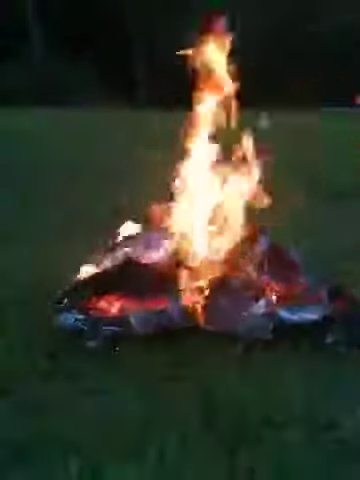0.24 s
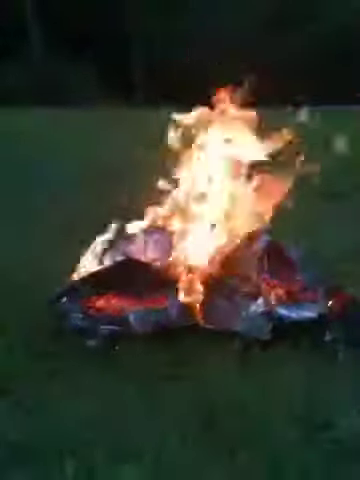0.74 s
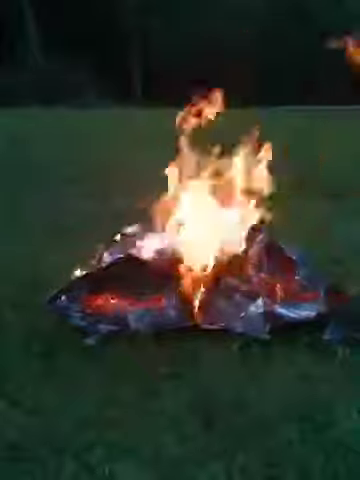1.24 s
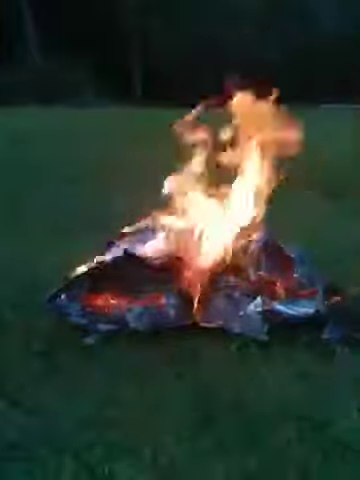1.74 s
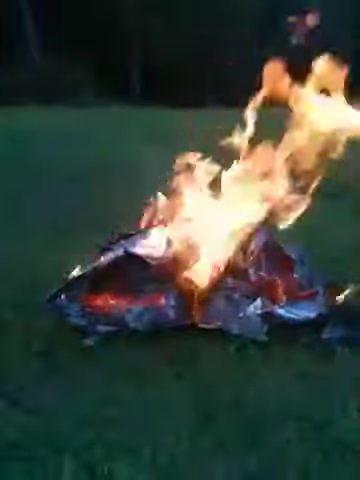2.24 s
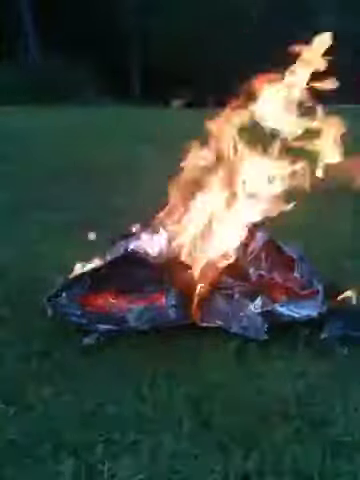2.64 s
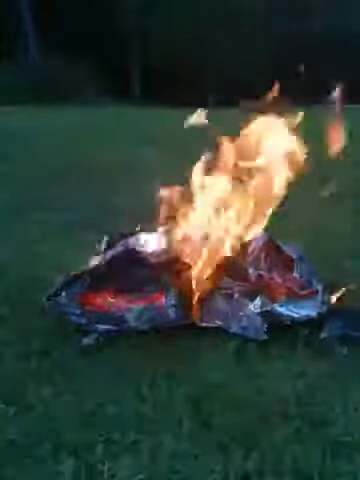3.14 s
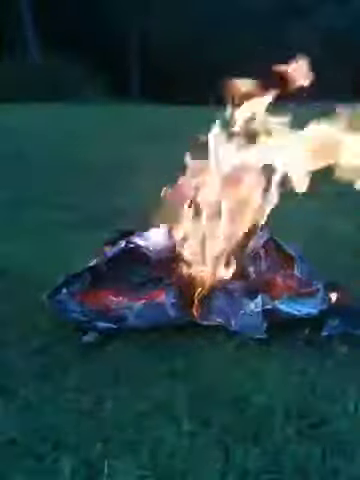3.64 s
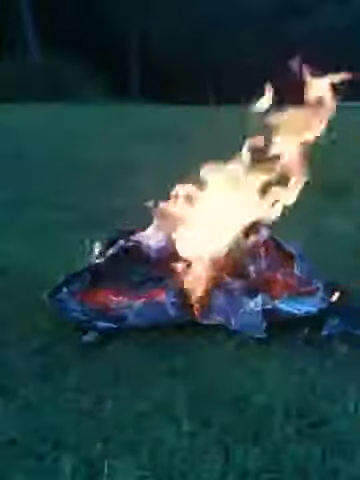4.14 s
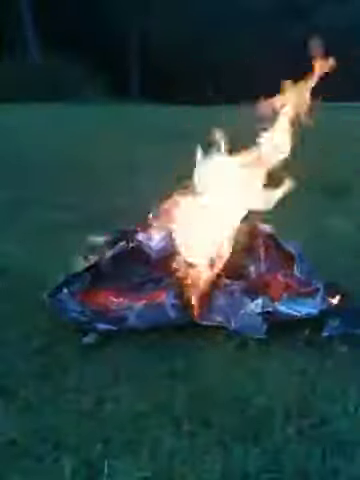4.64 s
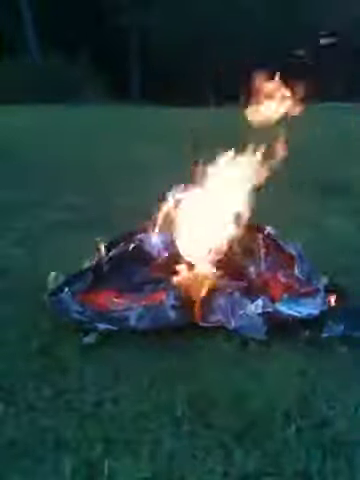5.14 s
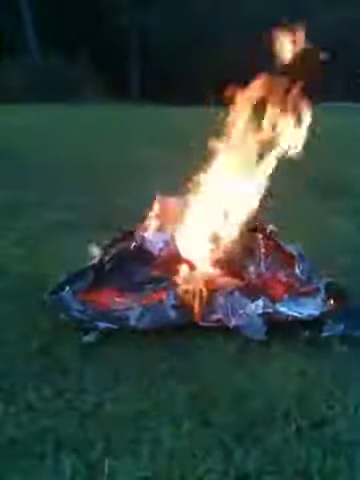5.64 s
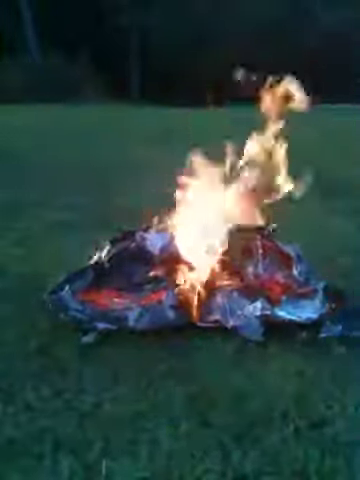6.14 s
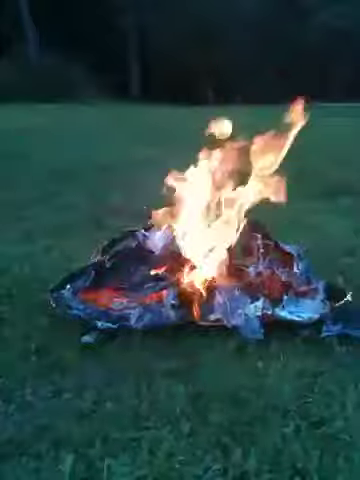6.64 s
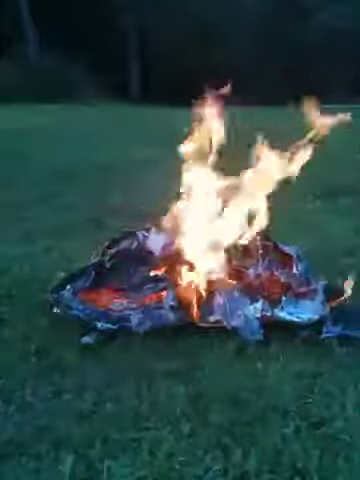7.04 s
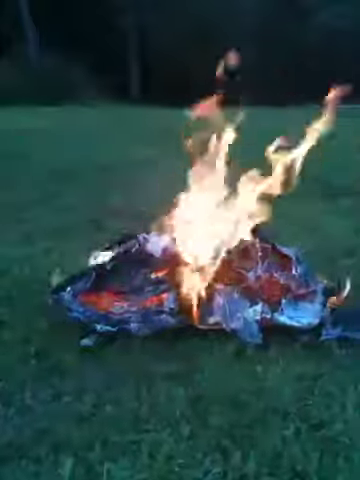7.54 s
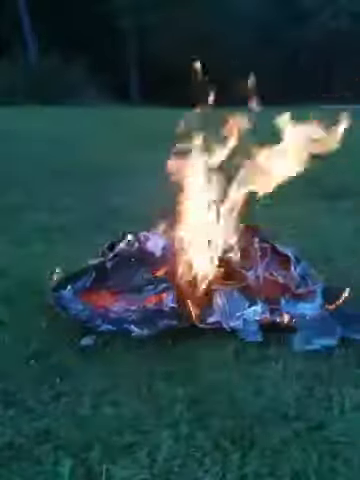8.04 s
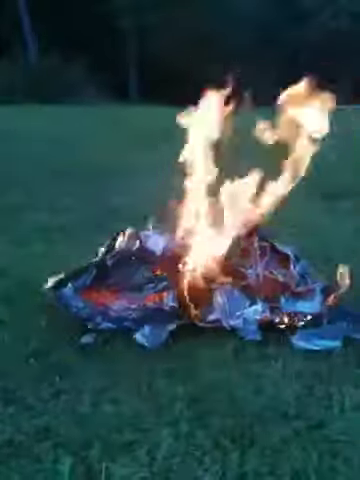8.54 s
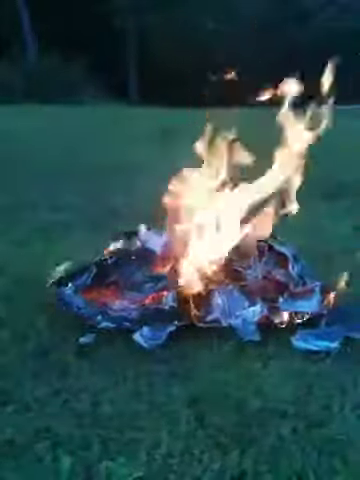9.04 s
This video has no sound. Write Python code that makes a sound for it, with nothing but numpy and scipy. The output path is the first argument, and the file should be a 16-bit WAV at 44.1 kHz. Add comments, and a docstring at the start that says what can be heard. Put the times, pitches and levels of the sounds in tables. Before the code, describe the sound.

A burning cardboard box on grass at dusk, heard from a few steps away, in mono. Low flames rumble and flutter softly under a steady airy hiss. Fine dry crackle never stops, and short ragged pops come in uneven clusters, some sharper and louder. Occasional low puffs and tiny treble spits appear. Behind lie a faint shrill insect-like band, a weak far hum and a very thin high whine. Dry open air, no echo.

```python
"""Flames rumble softly and hiss as a cardboard box burns on a lawn at dusk, a few steps away.
Shaped noise makes both; noise bursts ringing the board's resonances make a fine crackle and short ragged pops.
Behind lie a steady shrill noise band like evening insects, a faint far hum of sines and a thin electric whine.
Now and then a tongue of gas catches with a soft low puff, and tiny blisters spit pure treble."""
import sys
import numpy as np
from scipy import signal
from scipy.fft import rfft, irfft, next_fast_len
from scipy.io import wavfile

SR = 44100
rng = np.random.default_rng(int(sys.argv[2]) if len(sys.argv) > 2 else 0)


def to_wav(sig):
    """Store sig (one row per channel, or 1-D mono) as 16-bit WAV at the path in sys.argv[1].

    Samples outside -1..1 are clipped; the rate is SR.
    """
    pcm = np.clip(np.atleast_2d(sig), -1, 1) * 32767
    pcm = np.round(pcm).astype(np.int16)
    wavfile.write(sys.argv[1], SR, pcm.T)  # frames by channels


N = 409233  # length of the scene in samples


def from_db(db):
    """Logarithmic level: decibels become an amplitude gain."""
    return 10 ** (np.asarray(db) / 20)


def rms_one(x):
    """Normalisation: scale to a root-mean-square of 1."""
    return x / np.sqrt(np.mean(x ** 2) + 1e-20)


def curve_at(rows, s):
    """Linear interpolation: a curve's value at the given times."""
    return np.interp(s, *np.transpose(rows))


def anywhen(count):
    """Independent random events: moments spread evenly by chance over the scene."""
    return rng.uniform(0, N / SR, count)


def drift(rate):
    """Low-passed noise: a smooth random curve of spread 1 that changes about rate times a second."""
    step, settle = 40, 2000  # samples between points; points dropped while the filter settles
    pole = np.exp(-2 * step * np.pi * rate / SR)
    white = rng.standard_normal(N // step + settle + 2)
    slow = signal.lfilter([1], [1, -2 * pole, pole * pole], white)[settle:]
    return np.interp(np.arange(N) / step, np.arange(len(slow)), rms_one(slow))


def band(x, low_hz, high_hz, order=2):
    """Band limiting: a causal Butterworth band-pass."""
    edges_hz = [low_hz, min(high_hz, SR / 2 - 1)]
    return signal.sosfilt(signal.butter(order, edges_hz, "band", fs=SR, output="sos"), x)


def noise(spectrum):
    """Spectral shaping: white noise weighted by a spectrum, with an rms of 1."""
    hz, db = np.transpose(spectrum)
    size = next_fast_len(N)
    white = rfft(rng.standard_normal(size))
    bins_hz = np.maximum(np.arange(len(white)) * SR / size, 1)
    weights_db = np.interp(np.log(bins_hz), np.log(hz), db)
    return rms_one(irfft(white * from_db(weights_db), size)[:N])


def flutter(x, split_hz, low_db, high_db, per_s):
    """Amplitude modulation: the parts below and above a split pitch waver independently."""
    low = signal.sosfiltfilt(signal.butter(3, split_hz, fs=SR, output="sos"), x)
    high = x - low
    return low * from_db(low_db * drift(per_s)) + high * from_db(high_db * drift(per_s))


# size of the flames, before the rumble's trim. Columns: time_s, level_db
FLAME_SIZE = [(0, -58), (0.6, -59), (1.05, -57), (1.45, -58.8), (1.6, -57), (2.08, -59), (2.25, -58.5),
              (2.5, -59), (2.65, -55), (2.8, -59), (2.97, -56), (3.4, -58), (3.68, -57), (3.9, -59),
              (4.65, -60), (4.9, -59.5), (5.05, -57.5), (5.17, -61), (5.4, -58.5), (5.7, -61), (6.0, -59),
              (6.6, -60.5), (7.0, -58.5), (7.55, -59.5), (7.73, -61), (7.95, -57.5), (8.12, -60),
              (8.45, -57.5), (8.7, -59), (9.28, -59)]
# relative spectrum of the turbulent burning. Columns: frequency_hz, density_db (per Hz)
RUMBLE_SPECTRUM = [(20, -57), (50, -27), (80, -15), (120, -5), (165, 1.5), (250, -0.5), (350, -2.5),
                   (480, -8), (570, -17.5), (850, -16), (1200, -40), (2000, -46)]


def rumble():
    """Combustion turbulence: low noise swells with the flames and flutters as they lick."""
    trim_db, lick_db, licks_per_s = -0.5, 1.3, 16.6
    sound = flutter(noise(RUMBLE_SPECTRUM), split_hz=200, low_db=lick_db, high_db=lick_db, per_s=licks_per_s)
    # the deepest part also heaves slowly
    sound = flutter(sound, split_hz=42, low_db=4.5, high_db=0.0, per_s=3.4)
    level_db = curve_at(FLAME_SIZE, np.arange(N) / SR) + trim_db
    return from_db(level_db) * sound


# how hard the board gives off gas, before the hiss's trim; it also drives the ticks.
# Columns: time_s, level_db
GAS_RELEASE = [(0.0, -51), (0.54, -53), (1.29, -51.5), (2.4, -52.5), (3.98, -51.5), (4.94, -53),
               (5.22, -52), (5.63, -54.5), (6.18, -52.5), (9.28, -53)]
# relative spectrum of the escaping gas. Columns: frequency_hz, density_db (per Hz)
HISS_SPECTRUM = [(500, -15.5), (800, -11.5), (1180, -5), (1600, 3), (2400, 1), (2750, -6.5), (3550, 0),
                 (3770, -1.5), (4100, 1), (4500, -1), (5600, -10), (7800, -7.5), (9000, -12.5),
                 (10300, -8.5), (13000, -18.5), (16000, -28)]


def hiss():
    """Jet noise: hot gas escaping from the board hisses and flutters."""
    trim_db = -4  # level against the gas release
    sound = flutter(noise(HISS_SPECTRUM), split_hz=3050, low_db=1.4, high_db=2, per_s=35)
    level_db = curve_at(GAS_RELEASE, np.arange(N) / SR) + trim_db
    return from_db(level_db) * sound


def insects():
    """Narrow-band noise: a shrill far band, like a chorus of insects, wavers in level."""
    centre_hz, width_hz, level_db, waver_db = 7020, 600, -62.5, 1
    chorus = band(rng.standard_normal(N), centre_hz - width_hz / 2, centre_hz + width_hz / 2, order=1)
    chorus = rms_one(band(chorus, 5870, 7380))
    return from_db(level_db + waver_db * drift(8.0)) * chorus


# the partials of the far hum. Columns: frequency_hz, level_db (rms)
HUM_PARTIALS = [(86, -101), (173, -74), (255, -70.5), (506, -83)]


def hum():
    """Phase modulation: each far partial is a sine whose phase wanders slowly."""
    t, out = np.arange(N) / SR, 0
    for hz, db in HUM_PARTIALS:
        phase = 2 * np.pi * hz * t + 1.52 * drift(0.89)  # wander in radians
        out = out + from_db(db) * np.sqrt(2) * np.sin(phase)
    return out


def whine():
    """Polarity reversal: a thin high sine that keeps flipping its sign splits into close sidebands."""
    pitch_hz, flip_hz, level_db = 15000, 29.97, -73
    t = np.arange(N) / SR
    polarity = np.tanh(10 * np.sin(2 * np.pi * flip_hz * t))
    tone = np.sin(2 * np.pi * pitch_hz * t) * polarity
    return from_db(level_db) * rms_one(band(tone, pitch_hz - 190, pitch_hz + 190))


def peak(hz, width_hz, db):
    """Second-order resonance: one filter section, a hollow if db is negative."""
    gain, damping = from_db(db / 2), np.pi * width_hz / SR
    turn = -2 * np.cos(2 * np.pi * hz / SR)
    zeros = [1 + damping * gain, turn, 1 - damping * gain]
    poles = [1 + damping / gain, turn, 1 - damping / gain]
    return np.array(zeros + poles) / poles[0]


# peaks and hollows in the board's response. Columns: frequency_hz, width_hz, height_db
BOARD_MODES = [(1130, 66, -13), (1612, 32, 6), (2580, 110, 1.5), (2720, 89, -20.5), (3577, 146, 8),
               (3750, 115, -6.5), (4093, 340, 7.5), (5636, 390, -9.5), (7400, 420, 1), (8480, 1700, -7),
               (12570, 3200, -9.5)]


def board(x):
    """Modal filtering: a chain of peaks and hollows; the narrow ones ring for a few milliseconds."""
    return signal.sosfilt([peak(*row) for row in BOARD_MODES], x)


# ranges in which the board sounds, in the order thud, knock, crack, snap; base levels of a small tick.
# Columns: low_hz, high_hz, tick_level_db
BOARD_RANGES = [(665, 1090, -76.5), (1452, 2430, -65), (2630, 5310, -60.5), (5390, 12300, -66)]


def bursts(times, decays, rings_hz, rings_db, levels_db, grain_db, rise_s):
    """Impulsive excitation: a sharp break and a run of tearing fibres ring the pocket and the board."""
    length, head = 1600, 353  # samples: whole burst, and its first 8 ms, which set its level
    ring_share = .12  # width of a pocket's resonance as a share of its pitch
    break_db, break_s = 5.5, .0008  # first break against the tearing: strength, decay time
    slow_tear_s = .005  # bursts that last longer than this open with hardly any break
    scatter_db, scatter_s = -20, .011  # weak tail thrown back by the heap and the ground
    t = np.arange(length) / SR
    chance = rng.standard_normal((len(times), 2, length), dtype=np.float32)
    fibres = chance[:, 0] * from_db(grain_db * np.minimum(chance[:, 1], 1))
    decays = np.abs(decays)[:, None]
    first_break = from_db(break_db) * np.exp(-t / break_s) * np.exp(-(decays / slow_tear_s) ** 2)
    scatter = from_db(scatter_db) * np.exp(-t / scatter_s)
    shape = (1 - np.exp(-t / rise_s)) * (first_break + np.exp(-t / decays) + scatter)
    rung = []
    for hz, db, tear in zip(rings_hz, rings_db, fibres * shape):
        b, a = np.split(peak(hz, hz * ring_share, db), 2)
        rung.append(signal.lfilter(b, a, tear))
    tears = board(rung)
    # the size and place of a tear decide how strongly it drives each range of the board
    sounds = 0
    for (low_hz, high_hz, _), db in zip(BOARD_RANGES, levels_db):
        part = band(tears, low_hz, high_hz, order=3)
        gains = from_db(db) / part[:, :head].std(axis=1)
        sounds = sounds + part * gains[:, None]
    out = np.zeros(N + length)
    for at, sound in zip(np.clip(times * SR, 0, N).astype(int), sounds):
        out[at:at + length] += sound
    return out[:N]


def ticks(times, level_db, bright_db, size_spread_db, tilt_spread_db, range_spread_db, decay_s):
    """Random excitation: small bursts, dull or bright by chance, stronger while more gas escapes."""
    count = len(times)
    rings_hz = np.exp(rng.uniform(np.log(1400), np.log(9000), count))
    size, tilt, length, *own = np.clip(rng.standard_normal((count, 3 + len(BOARD_RANGES))), -2, 2).T
    vigour_db = curve_at(GAS_RELEASE, times) - np.mean(np.array(GAS_RELEASE)[:, 1])
    sizes_db = level_db + vigour_db + size_spread_db * size
    tilts_db = bright_db + tilt_spread_db * tilt
    slopes = np.linspace(-1, 1, len(BOARD_RANGES))  # brightness lifts the high ranges, lowers the low
    levels_db = [tick_db + sizes_db + tilts_db * slope + range_spread_db * luck
                 for (_, _, tick_db), slope, luck in zip(BOARD_RANGES, slopes, own)]
    decays = decay_s * from_db(4 * length)
    rings_db = np.full(count, 9)
    return bursts(times, decays, rings_hz, rings_db, levels_db, grain_db=6.0, rise_s=0.00048)


def pips(times, level_db, spread_db, low_hz, high_hz, decay_s, rise_s):
    """Damped oscillation: small pockets that open cleanly ring on one pitch, coloured by the board."""
    length = 700  # samples
    t, out = np.arange(length) / SR, np.zeros(N + length)
    shape = (1 - np.exp(-t / rise_s)) * np.exp(-t / decay_s)
    for at, (size, pitch) in zip((times * SR).astype(int), rng.random((len(times), 2))):
        hz = low_hz * (high_hz / low_hz) ** pitch
        gain = from_db(level_db - spread_db * size)
        out[at:at + length] += gain * shape * np.sin(2 * np.pi * hz * t)
    return board(out[:N] + 1e-18)


# the clearest spits of tiny blisters, levels before the trim. Columns: start_s, level_db
CLEAR_SPITS = [(1.3133, -38.5), (1.4082, -40), (2.048, -37), (2.7736, -42), (3.62, -43), (3.9644, -43),
               (4.2497, -40), (4.4448, -42), (5.5504, -41), (5.6017, -36), (5.7452, -36), (5.892, -42),
               (6.2697, -40), (6.78, -42), (7.0579, -39), (8.227, -35.5), (9.2209, -38.5)]


def spits(level_db, faint_count, faint_db, spread_db, low_hz, high_hz, decay_s):
    """Exponential decay: blisters spit treble noise alone, a few clearly, more faintly at random."""
    times, clear_db = np.transpose(CLEAR_SPITS)
    starts = np.zeros(N)
    faint_at = (anywhen(count=faint_count) * SR).astype(int)
    starts[faint_at] = from_db(faint_db + spread_db * rng.uniform(-1, 1, faint_count))
    starts[(times * SR).astype(int)] = from_db(clear_db + level_db)
    envelope = signal.lfilter([1], [1, -np.exp(-1 / (decay_s * SR))], starts + 1e-18)
    return envelope * rms_one(band(rng.standard_normal(N), low_hz, high_hz))


def crackle():
    """Superposition of small events: fine ticks, dry clicks of embers, thin spits and pitched pips."""
    fine = ticks(anywhen(count=520), level_db=-1.5, bright_db=-0.1, size_spread_db=1.0,
                 tilt_spread_db=3.5, range_spread_db=3.5, decay_s=0.0026)
    embers = ticks(anywhen(count=260), level_db=0.4, bright_db=-1.5, size_spread_db=1.5,
                   tilt_spread_db=4.5, range_spread_db=3.0, decay_s=0.001)
    thin = spits(level_db=-7, faint_count=45, faint_db=-52.5, spread_db=-3.0,
                 low_hz=7650, high_hz=12600, decay_s=0.0025)
    pitched = pips(anywhen(count=90), level_db=-43, spread_db=6, low_hz=1400, high_hz=4890,
                   decay_s=0.0017, rise_s=0.0005)
    return fine + embers + thin + pitched


# bursting pockets; the last four levels are rms over the first 8 ms of each range, before the trim.
# Columns: start_s, decay_s, ring_hz, ring_height_db, thud_db, knock_db, crack_db, snap_db
POCKET_POPS = [(0.0832, 0.003, 3800, 14, -70, -52, -44, -52), (0.0973, 0.0045, 1680, 6, -76, -52, -52, -55),
               (0.108, 0.003, 2100, 6, -65.0, -49, -52, -54),
               (0.1117, 0.0016, 7300, 11, -70, -53, -51, -51),
               (0.1224, 0.0042, 7300, 12, -73.0, -51, -49, -51.0),
               (0.145, 0.003, 2940, 10, -71, -54, -49.5, -54), (0.155, 0.002, 4600, 8, -74, -59, -55, -54),
               (0.16, 0.0051, 3900, 4, -76, -59, -53, -60), (0.2174, 0.0018, 4090, 9, -80, -54, -51, -54.5),
               (0.3158, 0.011, 5700, 12, -78.5, -56, -52, -60), (0.369, 0.002, 4390, 9, -78, -56, -54, -70),
               (0.3992, 0.01, 3800, 9, -78.5, -59, -53, -61), (0.471, 0.002, 1750, 8, -76, -52, -55, -62),
               (0.4815, 0.002, 6600, 8, -78, -64, -53, -54),
               (0.5558, 0.0072, 7300, 6, -68.0, -64, -44.5, -57),
               (0.579, 0.002, 3530, 10, -75, -59, -50, -56), (0.588, 0.005, 4010, 14, -76, -49.5, -45, -54),
               (0.6144, 0.011, 6200, 16, -78.5, -65, -50, -58),
               (0.843, 0.0043, 3940, 4, -71, -61, -44, -44.5),
               (0.9136, 0.0099, 6160, 6, -63.0, -51, -46, -58),
               (1.023, 0.001, 2000, 10, -78, -50.5, -56, -70), (1.0853, 0.002, 4130, 9, -77, -56, -56, -70),
               (1.0903, 0.003, 3400, 14, -78.0, -53.5, -47, -60),
               (1.1403, 0.0043, 1440, 9, -69, -52, -46, -56.5),
               (1.1692, 0.001, 6090, 12, -71, -67, -49, -53),
               (1.24, 0.0054, 4900, 6, -78.0, -54, -49.5, -52),
               (1.3216, 0.0076, 5770, 4, -78.5, -53, -50, -55.0),
               (1.346, 0.002, 3570, 9, -78, -67, -53.5, -62),
               (1.3564, 0.0082, 2500, 12, -68.5, -56, -51, -55),
               (1.38, 0.003, 3110, 12, -67.0, -65.0, -52.5, -65.5),
               (1.409, 0.0021, 2940, 9, -74, -63, -52, -56),
               (1.4326, 0.0054, 7100, 1, -66, -57, -39.5, -39.5),
               (1.4588, 0.002, 3530, 10, -74, -67, -53, -64), (1.49, 0.002, 2200, 19, -68, -52, -64, -70),
               (1.5755, 0.0059, 3840, 17, -68.5, -51.5, -44.5, -49.5),
               (1.5978, 0.0053, 2690, 9, -68.5, -58.0, -49, -50.5),
               (1.8173, 0.0045, 4400, 5, -63, -51.5, -45, -50),
               (1.8788, 0.0058, 5660, 4, -68.5, -51, -51.5, -60),
               (1.9602, 0.0033, 4310, 7, -77.5, -65, -52, -65.0),
               (2.025, 0.0026, 1750, 12, -77, -52, -53, -70),
               (2.0353, 0.0018, 4350, 12, -80, -70, -53, -70),
               (2.1363, 0.0063, 10500, 6, -78.5, -60, -52.5, -57.5),
               (2.1937, 0.002, 4450, 15, -75, -56, -46, -52), (2.194, 0.002, 2050, 12, -76, -49, -62, -60),
               (2.222, 0.002, 4010, 9, -76, -68, -53.5, -63),
               (2.2348, 0.0036, 1520, 12, -79.0, -48, -54, -66),
               (2.2526, 0.0026, 2190, 15, -75, -46.0, -44.5, -56),
               (2.262, 0.004, 3500, 12, -76, -56, -48, -58), (2.3157, 0.006, 2890, 12, -67, -63, -50, -55),
               (2.3317, 0.015, 5500, 9, -69, -52.5, -49.5, -53),
               (2.4234, 0.0091, 2330, 12, -71, -56, -50.5, -62),
               (2.5252, 0.002, 4950, 14, -73, -56, -53, -60),
               (2.6875, 0.0027, 2890, 13, -74, -66.0, -50.5, -66.5),
               (2.808, 0.0036, 2120, 15, -78.0, -51.0, -55, -64.0),
               (2.906, 0.0063, 4270, 12, -74, -55, -52.5, -57),
               (2.94, 0.0063, 3200, 6, -64, -62, -53.5, -65),
               (3.035, 0.0082, 7300, 7, -65, -53, -49, -48.5),
               (3.0562, 0.0027, 2830, 12, -68.5, -44, -43.0, -57),
               (3.099, 0.0053, 3470, 19, -77.5, -56, -52, -70),
               (3.1667, 0.0048, 9250, 6, -77.0, -57, -58, -63.5),
               (3.2066, 0.002, 3490, 9, -71, -54, -51, -53), (3.2123, 0.0018, 1150, 19, -54, -43, -47, -57),
               (3.261, 0.0063, 4330, 7, -64, -53.5, -42.5, -46.5),
               (3.2705, 0.002, 1600, 6, -66, -52, -50, -60),
               (3.2879, 0.0024, 3380, 16, -77.0, -52.0, -40, -60),
               (3.305, 0.0044, 4080, 6, -74.0, -56.5, -48, -60.5),
               (3.3395, 0.013, 8600, 6, -66, -55, -52, -57), (3.4716, 0.0023, 3400, 9, -69, -55, -51, -57),
               (3.5699, 0.002, 2070, 9, -63, -57, -54, -62),
               (3.547, 0.0025, 3760, 12, -77.0, -60, -47, -54),
               (3.6762, 0.0065, 4470, 12, -64.5, -54.0, -43.5, -50),
               (3.714, 0.0091, 4830, 9, -65, -50.5, -45, -50),
               (3.8922, 0.0012, 2240, 9, -72, -54, -53, -66),
               (3.902, 0.0044, 3940, 12, -74, -54, -51.5, -63),
               (3.952, 0.007, 1410, 12, -66, -50, -49.5, -64), (3.9816, 0.002, 4220, 6, -73, -59, -52, -57),
               (3.9875, 0.0063, 7440, 8, -65, -51.5, -48, -51),
               (4.0144, 0.0018, 1500, 15, -74, -49, -46.5, -57),
               (4.147, 0.0015, 4220, 12, -78, -70, -55, -70), (4.167, 0.01, 1460, 14, -63, -58, -53, -56),
               (4.2482, 0.0053, 3530, 9, -68, -66, -55, -61),
               (4.364, 0.0084, 10310, 6, -62, -51, -49, -58.5),
               (4.377, 0.01, 3940, 10, -71.5, -55, -45, -51.0),
               (4.445, 0.0044, 9940, 12, -76, -61, -53, -52), (4.486, 0.011, 4990, 6, -77, -64, -55, -54),
               (4.5, 0.011, 7710, 6, -61, -57, -51.5, -54.0),
               (4.5184, 0.0034, 5660, 7, -79, -54.0, -47.5, -56),
               (4.5402, 0.006, 2550, 4, -72.5, -50.5, -50, -54),
               (4.5564, 0.0022, 4090, 9, -72, -60, -53.5, -60), (4.577, 0.002, 4090, 9, -70, -54, -53, -67),
               (4.609, 0.0025, 1490, 15, -69, -51, -59, -70), (4.656, 0.0018, 1830, 12, -51, -39, -52, -60),
               (4.6561, 0.0016, 4020, 20, -62, -50, -39, -54.5),
               (4.9148, 0.01, 6670, 6, -78.5, -65, -54, -68),
               (4.9774, 0.0045, 3170, 15, -77.5, -60, -49, -66),
               (4.989, 0.0025, 3920, 10, -78, -61, -51.5, -70),
               (5.0117, 0.002, 4780, 9, -70, -62, -53, -55), (5.054, 0.011, 2170, 15, -75.5, -56, -47, -55),
               (5.0748, 0.0032, 2690, 12, -73.5, -55, -49, -51),
               (5.172, 0.0046, 3500, 12, -73, -54, -48.5, -62.5),
               (5.2137, 0.0052, 3940, 12, -60, -55, -45.5, -51),
               (5.2601, 0.0033, 3050, 12, -75.5, -53, -55, -60),
               (5.3062, 0.01, 2240, 9, -74, -49, -46, -57.0),
               (5.3176, 0.0075, 2180, 2, -59.5, -48, -42.5, -51.0),
               (5.326, 0.003, 3550, 10, -66, -48, -44.5, -56),
               (5.3397, 0.0055, 3380, 12, -72.0, -55, -49, -56.0),
               (5.3755, 0.0033, 2330, 11, -74.5, -52.0, -56, -61),
               (5.4138, 0.011, 3050, 11, -68.5, -55, -55.0, -64),
               (5.4634, 0.0045, 4600, 6, -78, -45.5, -41.5, -49),
               (5.6166, 0.0025, 10500, 3, -79.0, -55.5, -55, -51),
               (5.86, 0.0082, 1440, 15, -58, -48.0, -50, -59),
               (5.9266, 0.0099, 6910, 4, -75.5, -57, -51, -58),
               (5.948, 0.0017, 1910, 12, -71, -52.5, -64, -64),
               (6.0731, 0.0076, 3470, 10, -61, -49, -41.5, -45),
               (6.0905, 0.0032, 3400, 12, -68.0, -51, -45.5, -62),
               (6.1154, 0.0027, 2280, 12, -78.0, -54, -49, -46.5),
               (6.177, 0.012, 4900, 12, -67, -61, -52, -57), (6.198, 0.0018, 4950, 7, -51, -42.5, -33, -42),
               (6.1983, 0.002, 620, 9, -53, -55, -50, -58),
               (6.228, 0.0035, 4230, 9, -77.5, -64, -51.5, -59.0),
               (6.242, 0.0012, 2010, 6, -64.0, -49, -65.5, -65.5),
               (6.313, 0.002, 3500, 14, -58, -56, -51, -64.5),
               (6.3594, 0.0061, 4230, -1, -77.0, -57, -45.5, -55),
               (6.3746, 0.002, 4050, 6, -76, -58, -52.5, -55),
               (6.3805, 0.01, 8440, 6, -77.5, -56, -47.5, -54),
               (6.4307, 0.0055, 3530, 9, -77.5, -50.5, -45, -49.5),
               (6.504, 0.0071, 4900, 6, -74, -68, -49, -54), (6.5123, 0.0025, 4900, 14, -67, -65, -53, -52),
               (6.5395, 0.0044, 5980, 9, -64, -60, -56, -56.5),
               (6.566, 0.0025, 9940, 8, -77.0, -59.5, -52, -54),
               (6.587, 0.005, 7710, 6, -58.5, -52, -52, -60),
               (6.653, 0.0026, 3050, 24, -77.0, -57, -47, -66.0),
               (6.899, 0.002, 4010, 7, -76, -57, -48, -56), (6.9055, 0.0033, 3000, 4, -68, -55, -47, -56),
               (6.926, 0.0034, 3280, 11, -56.5, -47.5, -46.5, -59),
               (7.1353, 0.007, 1590, 9, -62, -51, -46.5, -50),
               (7.156, 0.0045, 2600, 15, -61, -46, -40.5, -47),
               (7.1582, 0.0018, 3650, 15, -66, -53, -35, -51), (7.173, 0.01, 3000, 6, -66, -51, -50, -56),
               (7.2655, 0.009, 1450, 12, -66, -59, -51.5, -62),
               (7.3582, 0.0048, 1900, 6, -62, -52, -47, -58),
               (7.363, 0.003, 4600, 15, -68, -50, -43.5, -56),
               (7.372, 0.011, 2000, 6, -68, -55, -49.5, -56),
               (7.4228, 0.0036, 3450, 12, -70, -66, -52, -57.5),
               (7.445, 0.0076, 4550, 6, -71.0, -59, -52, -60),
               (7.533, 0.0025, 4080, 15, -64, -62.5, -49, -66),
               (7.628, 0.0023, 7100, 13, -79.0, -59.5, -47, -51),
               (7.6912, 0.0036, 3100, 16, -79.0, -68, -50, -64.5),
               (7.761, 0.0068, 3340, 9, -65, -57, -48.5, -52.0),
               (7.9724, 0.0036, 7040, 12, -68, -56, -47, -59),
               (8.0195, 0.0018, 4070, 14, -78.0, -53, -40, -51),
               (8.02, 0.0022, 4800, 16, -78, -62, -43.5, -51),
               (8.326, 0.0018, 4990, 12, -78.0, -60, -47, -45.5),
               (8.338, 0.0027, 6090, 8, -63, -59, -45, -46),
               (8.4785, 0.0033, 3980, 12, -68, -61, -45.5, -52),
               (8.5224, 0.0099, 3530, 4, -76, -61, -48.5, -51.5),
               (8.5446, 0.0036, 4160, 8, -63, -52.5, -52, -54.5),
               (8.7606, 0.0014, 6790, 1, -78.0, -61.0, -52, -59),
               (8.7962, 0.0019, 2740, 10, -78.5, -53.5, -54, -57.0),
               (8.857, 0.001, 3940, 9, -67, -72, -50.0, -70),
               (8.915, 0.0025, 3680, 14, -78.5, -56, -49, -65),
               (8.9335, 0.0041, 3940, 6, -78.0, -65.5, -46.5, -55),
               (8.961, 0.0017, 2370, 10, -73, -62, -49.5, -72),
               (9.041, 0.0017, 1970, 10, -77, -64, -48.5, -63.5),
               (9.0847, 0.0052, 7600, 12, -61, -52.5, -43, -47.5),
               (9.164, 0.002, 10500, 6, -66, -61, -50, -70),
               (9.1716, 0.0076, 10500, 6, -77, -56, -55, -53.5),
               (9.209, 0.00091, 4470, 9, -76, -69, -55.5, -69),
               (9.2482, 0.001, 4060, 8, -75, -69, -49.5, -70)]


def pops(level_db):
    """Sudden pressure release: each bursting pocket has its own length, pitch and colour."""
    times, decays, rings_hz, rings_db, *levels_db = np.transpose(POCKET_POPS)
    sound = bursts(times, decays, rings_hz, rings_db, levels_db, grain_db=9.0, rise_s=0.00025)
    return from_db(level_db) * sound


# soft puffs as a tongue of gas catches. Columns: start_s, peak_db, pitch_hz
GAS_PUFFS = [(1.287, -47, 225), (1.848, -45.5, 146), (3.694, -46.5, 260), (7.505, -47, 264),
             (8.34, -48, 183)]


def puffs():
    """Rapid expansion: each puff is a quick swell of low turbulence that dies away."""
    rise_s, width = 0.0048, 1.35  # time to full height; band reaches this ratio above and below the pitch
    t, out = np.arange(N) / SR, 0
    for start_s, peak_db, hz in GAS_PUFFS:
        age = np.clip((t - start_s) / rise_s, 0, 40)
        swell = rng.standard_normal(N) * age * np.exp(1 - age)
        puff = band(swell + 1e-18, hz / width, hz * width, order=4)
        out = out + from_db(peak_db) * puff / np.abs(puff).max()
    return out


def scene():
    """Superposition: the fire in front of the quiet garden, in one channel."""
    fire = rumble() + hiss() + crackle() + pops(level_db=0.35) + puffs()
    garden = insects() + hum() + whine()
    return (fire + garden)[None]


def record(dry):
    """Low-pass filtering: an elliptic filter cuts the top steeply."""
    cutoff_hz, ripple_db, stop_db = 15800, .2, 70
    return signal.sosfilt(signal.ellip(10, ripple_db, stop_db, cutoff_hz, fs=SR, output="sos"), dry)


dry = scene()
out = record(dry)
to_wav(out)
```